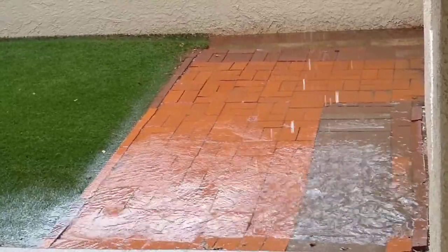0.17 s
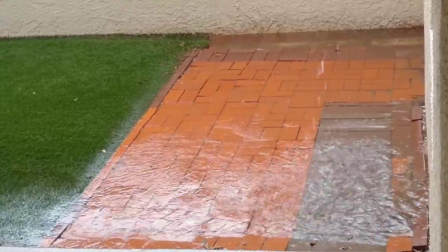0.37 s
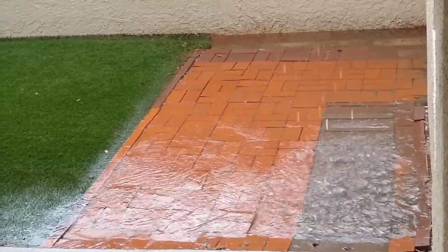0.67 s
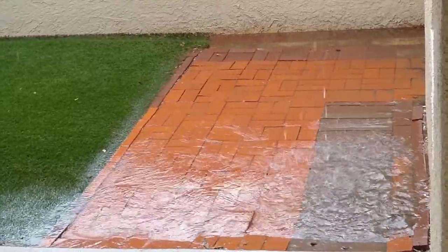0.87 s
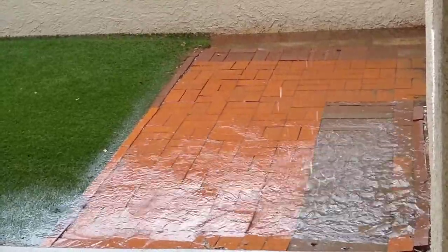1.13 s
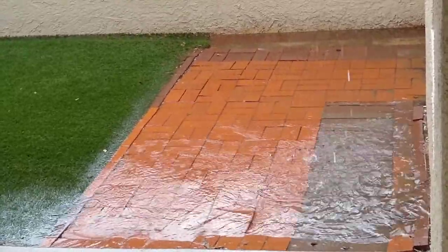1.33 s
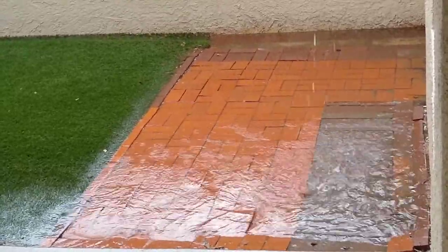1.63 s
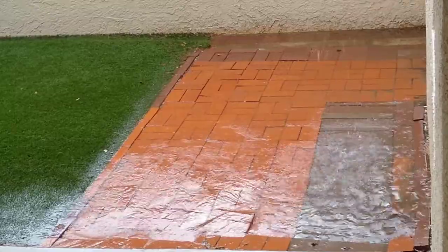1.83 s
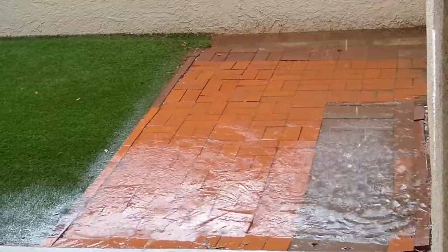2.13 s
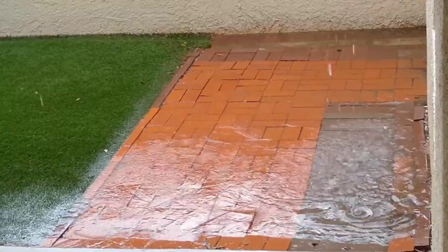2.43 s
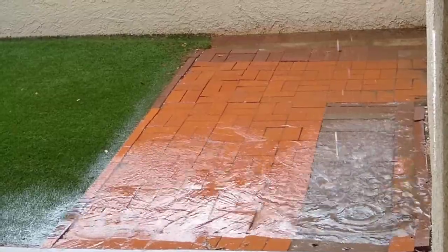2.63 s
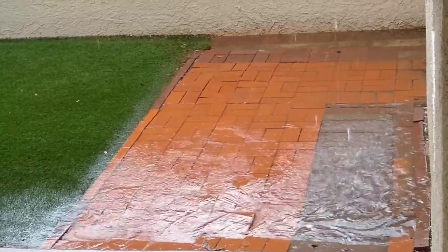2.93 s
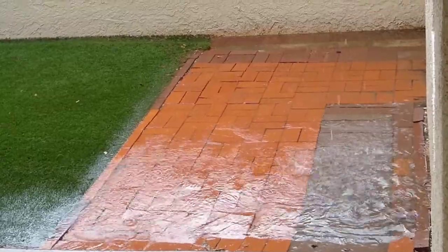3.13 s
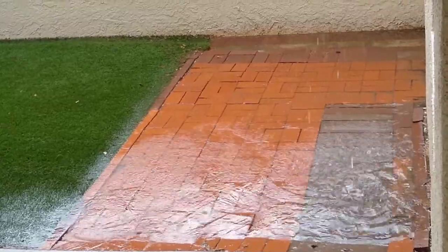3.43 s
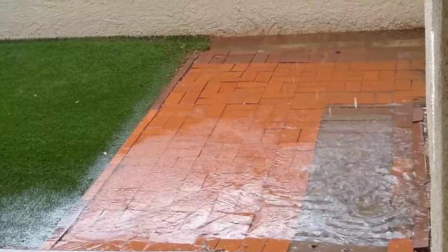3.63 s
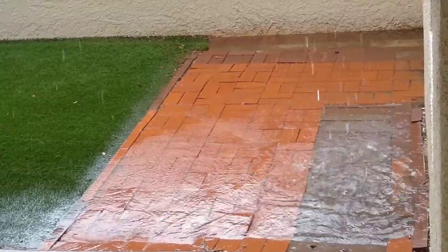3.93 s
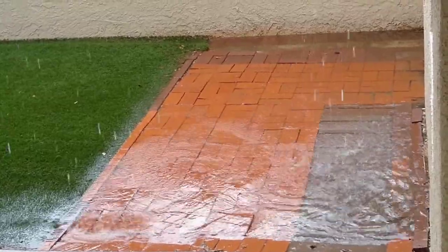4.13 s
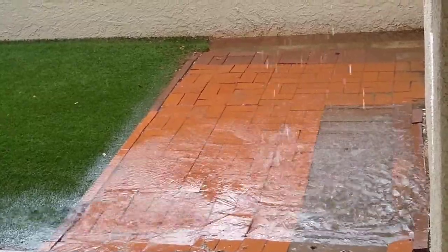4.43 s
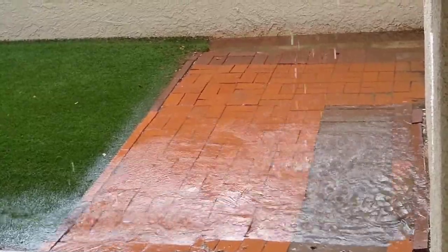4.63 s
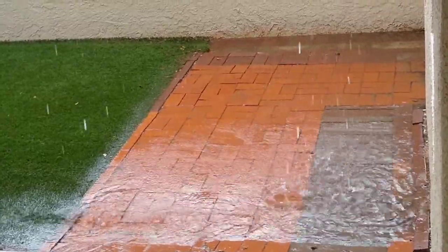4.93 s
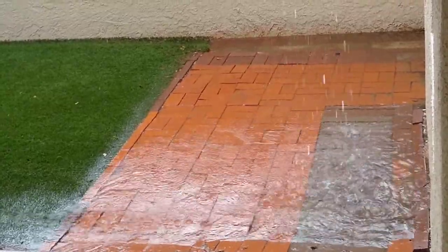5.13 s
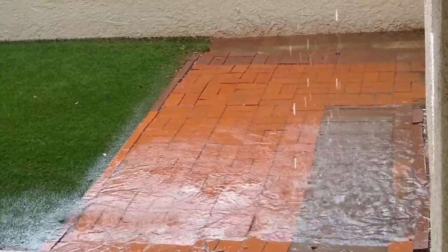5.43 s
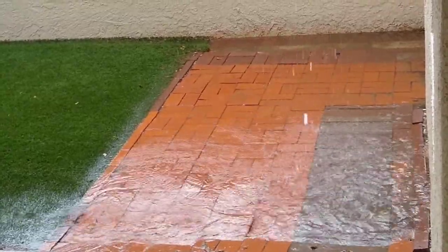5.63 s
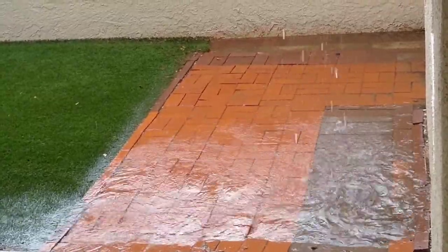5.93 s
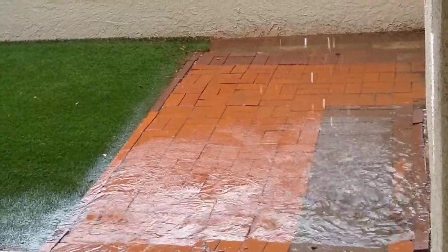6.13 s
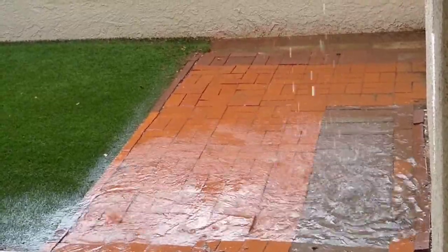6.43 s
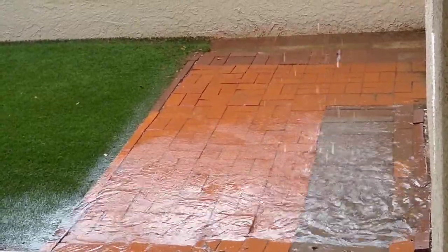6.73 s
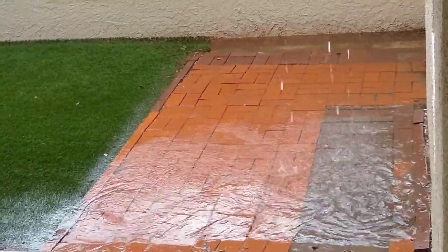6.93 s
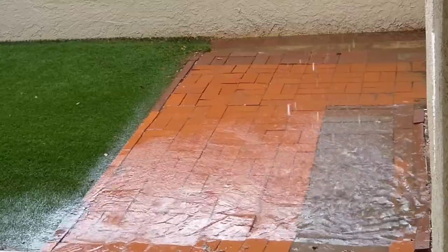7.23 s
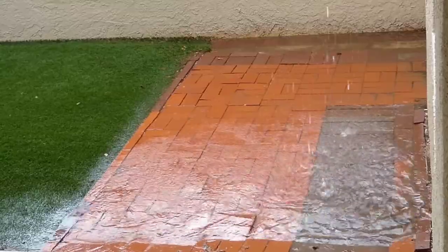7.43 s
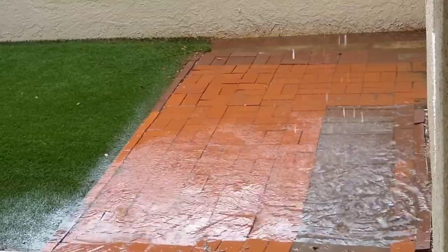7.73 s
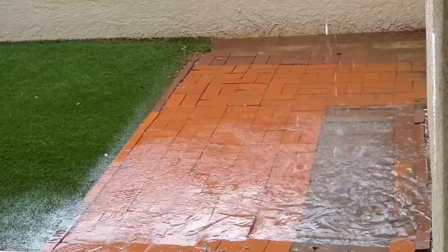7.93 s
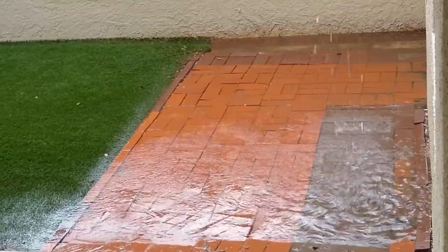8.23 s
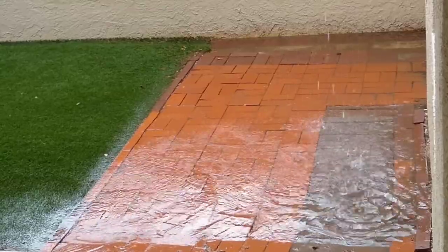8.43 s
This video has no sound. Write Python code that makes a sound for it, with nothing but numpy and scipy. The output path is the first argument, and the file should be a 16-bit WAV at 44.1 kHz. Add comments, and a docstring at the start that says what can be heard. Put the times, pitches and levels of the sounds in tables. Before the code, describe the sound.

A dense downpour on standing water between walls, busy with splattering run-off and small ringing drips over soft, slowly sinking low rolling noise.

```python
"""Downpour on a flooded patio

Heavy rain and roof run-off fall on flooded paving between walls. Far drops are a hiss of random
short-time spectra; near drops, splashing gouts and single big drops are built of damped bubble tones.
Under them rolls low filtered noise that slowly sinks. Two small microphone ports pick it all up."""
import sys
import numpy as np
from scipy import signal
from scipy.fft import rfft, irfft, next_fast_len
from scipy.io import wavfile
from scipy.ndimage import uniform_filter1d

SR = 44100
rng = np.random.default_rng(int(sys.argv[2]) if len(sys.argv) > 2 else 0)


def gain_from_db(level_db):
    """Convert decibel levels to linear amplitude factors (20 dB per decade)."""
    decades = np.asarray(level_db, float) / 20
    return 10 ** decades


def transcribe(signal):
    """Save signal, clipped to [-1, 1], as a 16-bit WAV file at the path in sys.argv[1]."""
    frames = np.atleast_2d(signal).T
    limited = np.clip(frames, -1, 1)
    pcm = np.round(limited * 32767).astype(np.int16)
    wavfile.write(sys.argv[1], SR, pcm)


N = 378819  # length in samples


def evened(x):
    """Scales to rms 1."""
    return x / np.sqrt(np.mean(x ** 2) + 1e-20)


def read(points, hz):
    """All value columns of a frequency table, interpolated on a log frequency axis."""
    f, *columns = np.transpose(points)
    return [np.interp(np.log(hz + 1), np.log(f + 1), column) for column in columns]


def add(mix, s, sound):
    """Mixes a sound in at time s, cut off where the mix ends."""
    part = mix[:, round(s * SR):][:, :sound.shape[1]]
    part += sound[:, :part.shape[1]]


def coloured(x, points):
    """Filters by a spectrum table, without shifting phase."""
    size = next_fast_len(N)
    gain_db = read(points, np.fft.rfftfreq(size, 1 / SR))[0]
    return irfft(rfft(x, size) * gain_from_db(gain_db), size)[:, :N]


def humps(s, rows, rise_s, fall_s):
    """Sum of swells in dB, each climbing exponentially to its top and dying away."""
    return sum(db * np.exp(-abs(s - top) / np.where(s < top, rise_s, fall_s)) for top, db in rows)


def bubble(hz, cycles, rise, turn):
    """A damped tone whose pitch climbs as the bubble nears the surface."""
    u = np.arange(int(4 * cycles * SR / hz) + 8) * hz / SR / cycles  # 1 after the given cycles
    envelope = (1 - np.exp(-12 * u)) * np.exp(-2 * u)
    return envelope * np.sin(2 * np.pi * (cycles * u * (1 + rise * u) + turn))


# Colour of the low noise. Each row: frequency in Hz, relative level in dB.
RUMBLE_TONE = [(18, -52), (30, -37), (41, -13), (59, 1.5), (115, -1), (145, 1.5), (175, -4), (205, -0.5),
               (233, -8.5), (265, -5.5), (400, -22), (520, -77), (880, -120)]
# Fresh rolls in the rumble. Each row: time of the top in seconds, lift in dB.
RUMBLE_ROLLS = [(0.2, 1.5), (0.43, 5.5), (0.65, 1), (2.2, 4.5), (2.95, 5), (3.5, 3.5), (4.7, 5.5),
                (6.02, 5.5), (6.4, 6.5), (8.45, 6)]


def rumble():
    """Low rolling noise from far off: the upper part sinks toward an end level, the deep end does not."""
    start_db, end_db, fade_s, deep_db = -44.5, -57.5, 4.5, -61
    roll_s = 0.2  # time constant of a roll, both ways
    deep_follows = 0.99  # share of each roll that reaches the deep end
    lumps = uniform_filter1d(rng.standard_normal(N), size=3000)
    lumps = evened(uniform_filter1d(lumps, size=3000))
    s = np.arange(N) / SR
    rolls_db = humps(s, RUMBLE_ROLLS, roll_s, roll_s)
    upper_db = end_db + (start_db - end_db) * np.exp(-s / fade_s) + rolls_db
    noise = coloured(rng.standard_normal((2, N)), RUMBLE_TONE)
    deep = signal.sosfiltfilt(signal.butter(N=2, Wn=85, fs=SR, output="sos"), noise)
    upper = gain_from_db(upper_db) * evened(noise - deep)
    deep = gain_from_db(deep_db + deep_follows * rolls_db) * evened(deep)
    return gain_from_db(0.66 * lumps) * (upper + deep)


# How hard the rain falls. Each row: time in seconds, level in dB (only its swing about the mean is used).
DOWNPOUR = [(0.0, -26.5), (0.81, -27.5), (0.91, -25), (1.6, -27.5), (1.82, -25.5), (2.25, -26), (2.54, -25),
            (3.56, -26.5), (3.76, -25.5), (4.76, -26), (7.13, -28), (7.29, -27.5), (7.8, -28.5),
            (8.59, -28.5)]
# Brief sheets of fine spray and brief lulls. Each row: time of the turn in seconds, change in dB.
SPRAY_SURGES = [(1.09, 2), (1.28, 0), (1.51, -3.5), (2.15, -6.5), (2.38, 3.5), (3.3, 3), (3.52, -2),
                (3.62, 2), (3.77, 4), (4.73, 4.5), (4.9, 1.5), (5.24, 2), (5.4, 4), (6.24, 3.5),
                (7.23, 0.5), (7.35, -4)]


def pour_db(s, hz):
    """Swing of the downpour: spray rules the treble, heavy water the middle, little of it the bass."""
    rise_s, fall_s = 0.021, 0.024  # time constants of a surge
    heavy_follows = 1.2  # heavier water exaggerates the swing
    t, db = np.transpose(DOWNPOUR)
    pour = np.interp(s, t, db - db.mean())
    spray = pour + humps(s, SPRAY_SURGES, rise_s, fall_s)
    heavy = heavy_follows * pour
    middle = np.clip(np.log(7500 / hz) / 1.8, 0, 1)
    reach = np.clip(np.log(hz / 250) / 2.4, 0, 1)
    return reach * ((1 - middle) * spray + middle * heavy)


def hiss(patchy_db=1.27, flicker_db=0.97):
    """Countless far drops: random short-time spectra with patches and a flicker shared above 600 Hz."""
    hop, window = 128, 512  # samples
    frames = N // hop + 5
    hz = np.fft.rfftfreq(window, 1 / SR)[:, None] + 1
    a, b, c, d, patches = rng.standard_normal((frames, 257, 5)).T
    patches = uniform_filter1d(patches, size=30, axis=0)  # smooth across frequency
    patches = evened(uniform_filter1d(patches, size=14, axis=1))  # and across time
    flicker = evened(uniform_filter1d(rng.standard_normal(frames), size=4))
    level_db = pour_db(np.arange(frames) * hop / SR, hz)
    level_db = level_db + patchy_db * patches + flicker_db * flicker * (hz > 600)
    spectra = np.array([a + 1j * b, c + 1j * d]) * gain_from_db(level_db)
    return evened(signal.istft(spectra, nperseg=window, noverlap=window - hop)[1][:, :N])


def drops(per_s=2600, spread_db=4.0, cycles=4.4, count=24):
    """Near drops: each rings a tiny bubble, reaching the two ports by paths of unequal length."""
    s, out = np.arange(N) / SR, np.zeros((2, N + 64))
    chance, size, kind = rng.random(N), np.minimum(rng.exponential(1, N), 5), rng.random(N)
    pitches = np.geomspace(600, 15000, count)
    share = np.cumsum(pitches ** .7) / np.sum(pitches ** .7)  # small high bubbles are the most common
    at = np.flatnonzero(chance < per_s / SR)
    which = np.searchsorted(share, kind[at])
    for k, hz in enumerate(pitches):
        train = np.zeros(N)
        mine = at[which == k]
        train[mine] = gain_from_db(spread_db * size[mine] + pour_db(s[mine], hz)) * hz ** 0.78
        for port, (length, turn, lag) in enumerate(rng.random((2, 3))):
            path = round(40 * lag)  # samples
            ring = bubble(hz, cycles * (0.41 + length), 0.2, turn)
            out[port, path:path + N] += signal.oaconvolve(train, ring)[:N]
    return evened(out[:, :N])


# Colour of the rain at the left port. Each row: frequency in Hz, relative level in dB.
RAIN_TONE = [(40, -38), (100, -14), (250, -9), (450, -6.5), (750, -8), (1200, -5.5), (1800, -1),
             (3300, 2.5), (4500, 1), (6000, 1.5), (10000, 0), (12500, -3.5), (15600, -5.5), (16100, -53)]


def rain():
    """Far hiss and near drops share one colour; the hiss is the louder bed."""
    far = gain_from_db(-27.5) * evened(coloured(hiss(), RAIN_TONE))
    close = gain_from_db(-34.0) * evened(coloured(drops(), RAIN_TONE))
    return far + close


def splash(db, hz, t60, luck):
    """A sudden swarm of bubbles about one pitch, with a skirt of fine droplets above; late ones are fainter."""
    octaves = 0.44  # sets how widely the bubbles scatter in pitch
    t60 = np.clip(t60, .02, .5)
    out = np.zeros((2, round(.6 * SR)))
    for port in range(2):
        for late, spread, turn in luck[port]:
            s = .5 * t60 * late ** 1.7
            step = 2 ** (2.73 * octaves * (spread - .4) + 1.15 * spread ** 4 + 0.12 * late)
            grain = bubble(min(hz * step, 14000), 4.5, .2, turn)
            level = step ** 0.47 * gain_from_db(-60 * s / t60)  # small bubbles ring briefly but hard
            add(out[port:port + 1], s, level * grain[None])
    return gain_from_db(db) * out * np.sqrt(t60 * hz / 500)  # thinly spread bubbles are each louder


def small_splashes(count=60):
    """Rows for the lesser gouts of run-off, scattered in time, size and pitch."""
    middle_db, range_db, middle_hz, octaves, t60 = -27, 8, 2400, 1.81, 0.14  # t60 in seconds
    return [(when * N / SR, middle_db + range_db * (size - .5), middle_hz * 2 ** (octaves * (pitch - .5)), t60)
            for when, size, pitch in rng.random((count, 3))]


# Gouts of run-off landing in the pool.
# Each row: start in seconds, relative level in dB, middle bubble pitch in Hz, 60 dB decay time in seconds.
GOUTS = [(0.015, -19, 1610, 0.28), (0.297, -20.5, 1700, 0.35), (0.346, -14, 2200, 0.16),
         (0.44, -17.5, 2580, 0.22), (0.485, -13.5, 4030, 0.13), (0.737, -23, 1380, 0.19),
         (1.066, -17.5, 2350, 0.32), (1.281, -12.5, 2100, 0.07), (1.379, -15, 1860, 0.16),
         (1.262, -19, 1300, 0.08), (1.585, -20, 2870, 0.27), (1.641, -13, 4770, 0.14),
         (1.758, -17, 1600, 0.34), (1.79, -16, 2100, 0.17), (1.813, -23, 2400, 0.16),
         (2.318, -20, 1030, 0.2), (2.361, -19, 1440, 0.14), (2.555, -10.5, 3500, 0.18),
         (2.643, -13.5, 1420, 0.097), (2.925, -19, 1410, 0.16), (3.133, -18.5, 1700, 0.23),
         (3.297, -15, 1730, 0.057), (3.605, -14.5, 1730, 0.11), (3.731, -21, 1770, 0.12),
         (4.015, -20, 2300, 0.32), (4.055, -20, 2100, 0.23), (4.462, -19, 1940, 0.27),
         (4.686, -17.5, 1710, 0.4), (4.724, -18, 1480, 0.13), (5.027, -12.5, 3300, 0.25),
         (5.171, -15.5, 2240, 0.14), (5.266, -18.5, 623, 0.12), (5.4, -21, 1340, 0.17),
         (5.619, -16.5, 2400, 0.2), (5.803, -24, 2050, 0.16), (6.09, -26, 520, 0.12),
         (6.147, -16.5, 1200, 0.21), (6.226, -29, 4820, 0.22), (6.376, -22, 1690, 0.42),
         (6.453, -14.5, 1430, 0.13), (6.609, -19.5, 2920, 0.35), (6.733, -18, 1550, 0.11),
         (6.837, -23.5, 750, 0.1), (6.923, -20, 2020, 0.33), (6.969, -14, 1730, 0.062),
         (7.231, -23, 1160, 0.097), (7.316, -22, 1670, 0.094), (7.605, -22.5, 1870, 0.36),
         (8.073, -21, 2020, 0.25), (8.194, -21, 3200, 0.33), (8.285, -12, 1360, 0.18),
         (8.322, -18.5, 1490, 0.22), (8.41, -21, 3600, 0.26)]


def run_off():
    """Each gout of water drives a swarm of bubbles into the pool, 50 toward each port."""
    out, rows = np.zeros((2, N)), small_splashes() + GOUTS
    for (s, db, hz, t60), luck in zip(rows, rng.random((len(rows), 2, 50, 3))):
        add(out, s, splash(db, hz, t60, luck))
    return out


def big_drop(db, hz, cycles, turn):
    """One ringing bubble, alike on both paths, with a quick echo off the wall."""
    ring = bubble(hz, cycles, 0.0067, turn)
    out = np.zeros((2, len(ring) + 200))
    add(out, 0, np.array([ring, ring]))
    add(out, .0021, 0.5 * np.array([ring, 0.45 * ring]))
    return gain_from_db(db - 1.0) * out


# Single big drops close by, each trapping one bubble.
# Each row: start in seconds, relative level in dB, pitch in Hz.
CLOSE_DROPS = [(0.3451, -15, 3300), (0.618, -9, 9270), (0.9814, -7, 8350), (1.0794, -7, 9500),
               (1.2775, -8, 9080), (1.6605, -15, 5500), (2.4678, -7, 8750), (2.555, -18, 3840),
               (3.066, -7, 7780), (3.2884, -14, 9310), (3.6047, -14.5, 3170), (3.743, -11, 5400),
               (4.0616, -9, 3240), (4.462, -10, 4740), (4.8853, -6, 10800), (5.0152, -12, 3200),
               (5.2403, -1, 2980), (5.3448, -13, 8280), (5.399, -7, 9500), (5.4585, -5, 9960),
               (5.803, -17, 2750), (6.064, -16, 5500), (6.286, -17, 3300), (6.4185, -14, 3270),
               (6.5006, -12, 10100), (6.579, -17, 2800), (6.9693, -15.5, 2070), (7.2, -10.5, 3120),
               (7.8642, -6, 9550), (8.1439, -12, 8890), (8.299, -11, 3540)]


def big_drops():
    """Lone ringing bubbles; the smaller and higher ones damp within fewer cycles."""
    out = np.zeros((2, N))
    for (s, db, hz), turn in zip(CLOSE_DROPS, rng.random(len(CLOSE_DROPS))):
        cycles = 4.5 * (hz / 3000) ** -0.25
        add(out, s, big_drop(db, hz, cycles, turn))
    return out


def walls(x, t60=0.3, level_db=-5):
    """The walls round the paving return a short loose tail, different toward each port."""
    t = np.arange(round(.5 * SR)) / SR
    sparse = rng.standard_normal((2, len(t))) * (rng.random((2, len(t))) < .08)
    taps = sparse * gain_from_db(-60 * t / t60) * (t > .006)
    return gain_from_db(level_db) * signal.oaconvolve(x, taps / np.linalg.norm(taps[0]), axes=1)[:, :N]


# The microphone's hearing of close water. Each row: frequency in Hz, gain in dB.
CLOSE_TONE = [(300, -9), (900, -3), (2000, 0), (15600, 0), (16100, -40)]


def close_water():
    """Splashes and big drops with their wall tail, coloured by the microphone."""
    water = run_off() + big_drops()
    return coloured(water + walls(water), CLOSE_TONE)


def scene():
    """Two paths of the same downpour, one for each port."""
    return rain() + close_water() + rumble()


# The port pair. Each row: frequency in Hz, left-right likeness from 0 to 1, left lead in radians,
# left-right level difference in dB.
PORT_PAIR = [(45, .76, 0, 2), (90, .86, 0, 1.2), (200, .96, 0, .1), (340, .91, .08, -1),
             (500, .72, .2, -1.5), (750, .38, .6, -1.1), (1050, .15, 1.9, -.5), (1450, .4, 2.7, -.3),
             (1800, .52, 3.1, 1.1), (2100, .2, 3.2, 3.5), (2500, .12, 1.9, .5), (6000, .12, 0, .9),
             (7350, .2, 0, -.5), (7650, .88, 0, -1.5), (8600, .88, 0, -5.8), (10000, .91, 0, -5.6),
             (11000, .91, 0, -2.6), (12200, .9, 0, -1.2), (13000, .72, 0, -.2), (16000, .38, 0, 1.2)]


def ports(dry):
    """The right port shares part of the left's sound, late and recoloured; most of it in the bass
    and from 7.65 to 12 kHz."""
    size = next_fast_len(N)
    same, lead, balance_db = read(PORT_PAIR, np.fft.rfftfreq(size, 1 / SR))
    same = np.clip(same, 0, 1)
    left, other = rfft(dry, size)
    shared = same * left * (np.cos(lead) - 1j * np.sin(lead))
    right = (shared + np.sqrt(1 - same ** 2) * other) * gain_from_db(-balance_db)
    return irfft(np.array([left, right]), size)[:, :N]


def roll_off(x):
    """The treble ends steeply here."""
    return signal.sosfilt(signal.butter(12, 16740, fs=SR, output="sos"), x)


def record(dry):
    """The two ports hear the scene, and their stereo signal is stored."""
    mix = ports(dry)
    return roll_off(mix)


dry = scene()
out = record(dry)
transcribe(out)
```